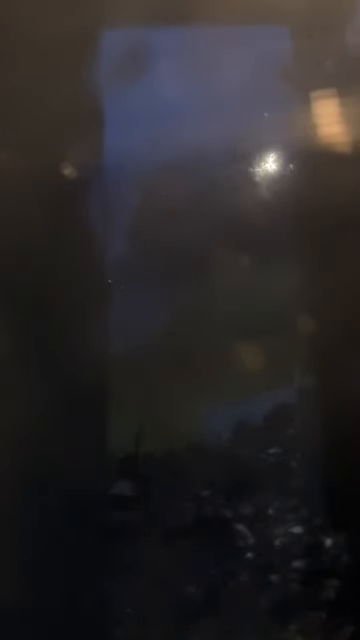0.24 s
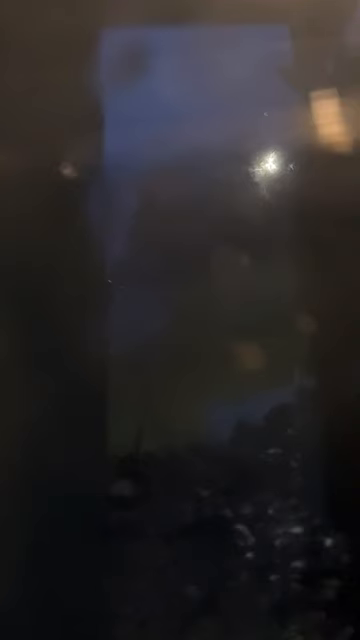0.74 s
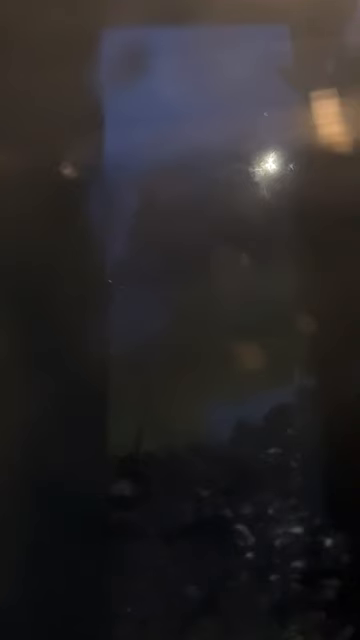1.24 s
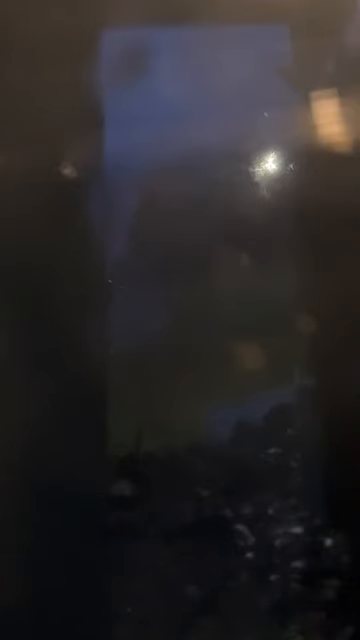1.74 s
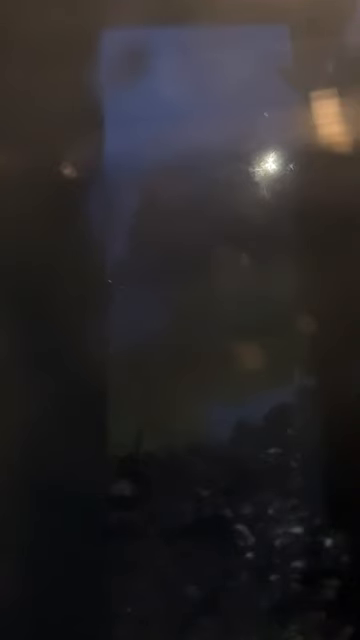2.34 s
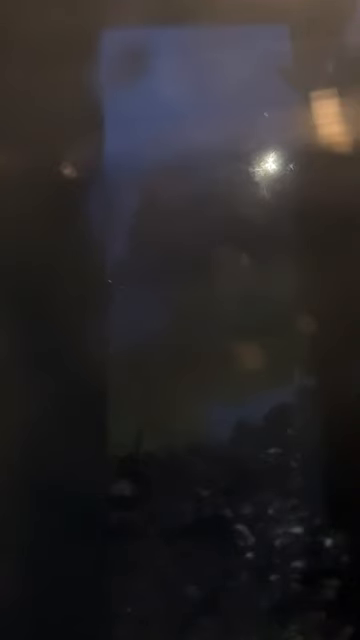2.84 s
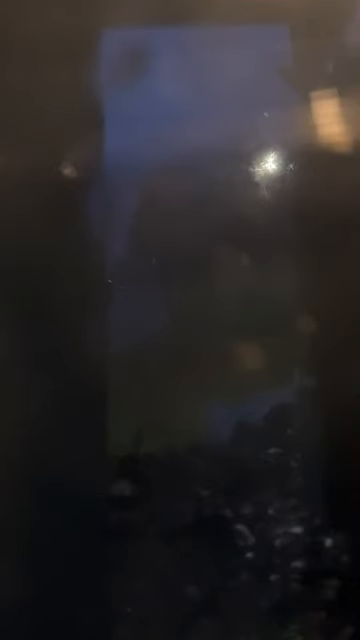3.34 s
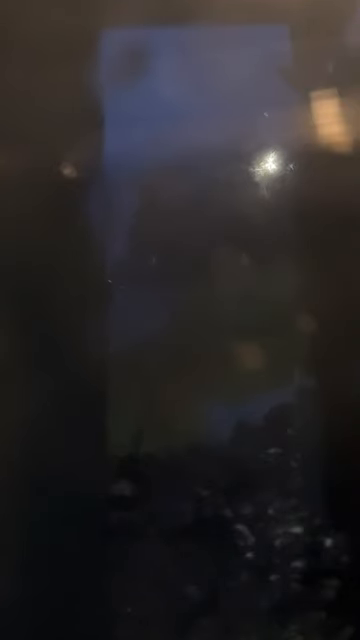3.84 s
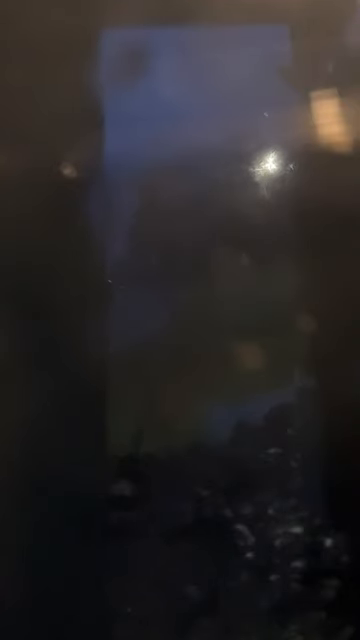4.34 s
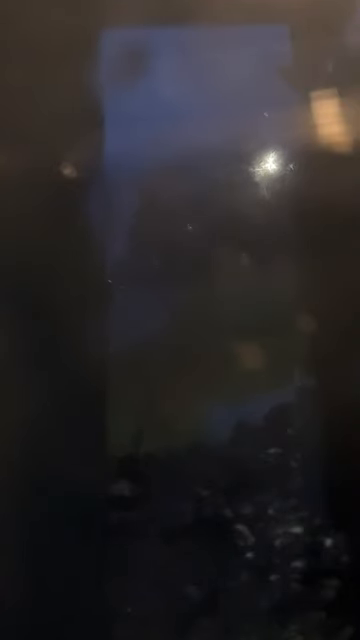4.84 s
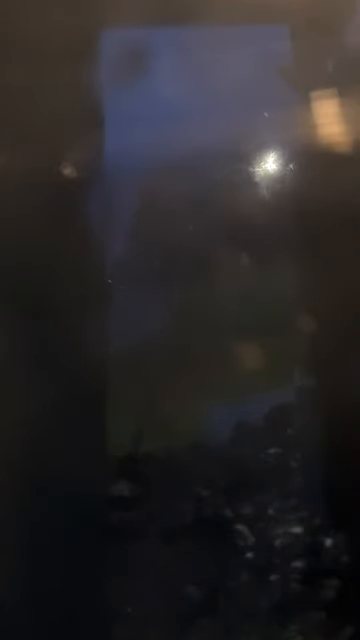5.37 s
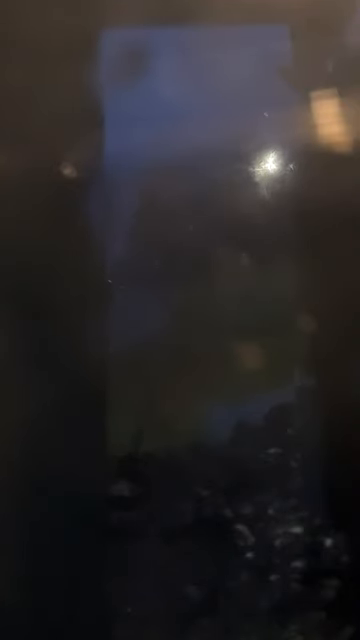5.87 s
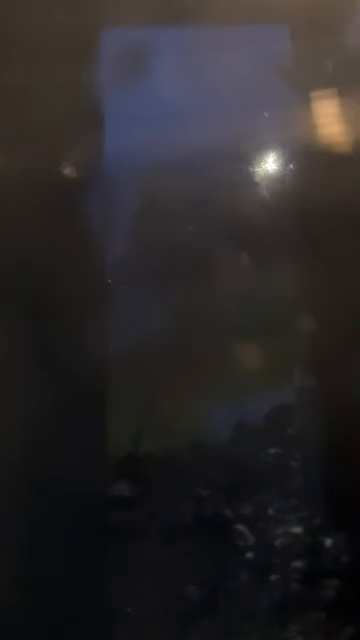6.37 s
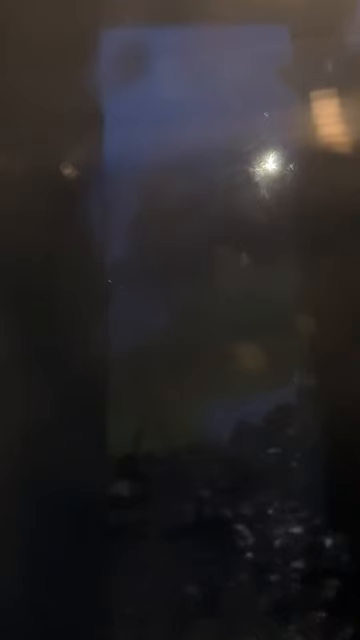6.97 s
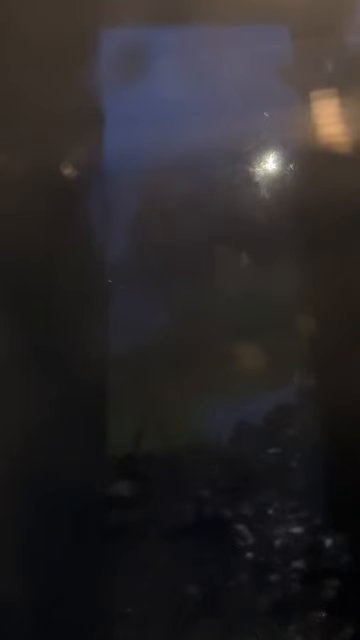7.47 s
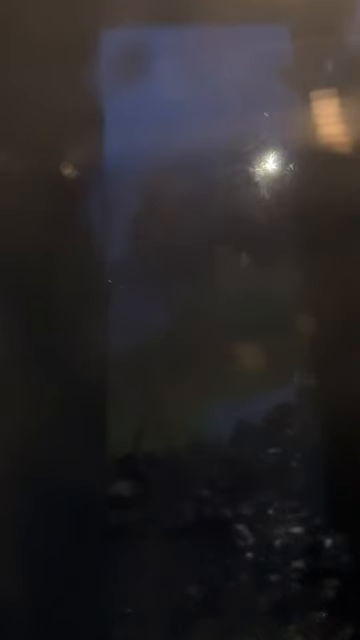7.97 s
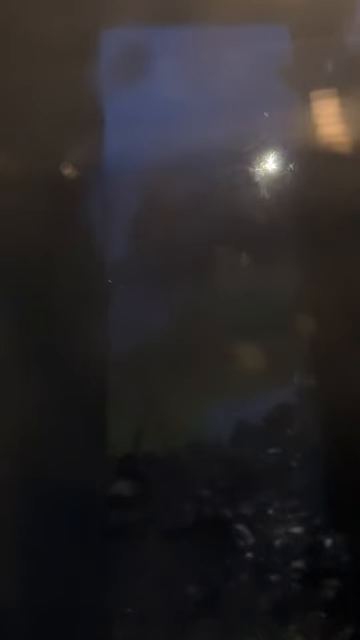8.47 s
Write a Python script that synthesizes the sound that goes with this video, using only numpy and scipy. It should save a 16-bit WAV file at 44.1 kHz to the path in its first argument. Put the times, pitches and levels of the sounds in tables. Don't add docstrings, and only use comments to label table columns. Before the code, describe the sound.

Indoors by a window on a rainy night, the microphone close to the glass. Drops strike the pane at random, crisp splashy ticks with short woody thuds, sparse at first and denser later, strongest around seven and a half seconds. Dull knocks come from the frame. Outside, drips plop from the gutter over soft patter, constant hiss and low town rumble.

```python
import sys
import numpy as np
from scipy import signal
from scipy.io import wavfile

SR = 44100
rng = np.random.default_rng(int(sys.argv[2]) if len(sys.argv) > 2 else 0)


def boost(x):
    u = np.asarray(x, float) / 20
    return 10 ** u


def materialize(psi):
    bounded = np.clip(np.atleast_2d(psi).T, -1, 1)
    quanta = np.round(bounded * 32767).astype(np.int16)
    wavfile.write(sys.argv[1], SR, quanta)


N = 384111

# f/Hz, level/dB, t60/s
HIGH_MODES = [(4280, -4, 0.0089), (4590, -1.5, 0.0028), (4900, -5.5, 0.0098), (5280, -3.5, 0.011),
              (6050, -0.5, 0.0061), (6420, -12, 0.022), (6840, -4, 0.0071), (7050, -2.5, 0.0036),
              (7580, -3, 0.0062), (8470, 0, 0.0035), (9140, -16, 0.0064), (9204, -2.5, 0.0092)]


def rms_one(x):
    return x / np.sqrt(np.mean(x ** 2) + 1e-20)


def drift(rate):
    r = np.exp(-80 * np.pi * rate / SR)
    slow = signal.lfilter([1], [1, -2 * r, r * r], rng.standard_normal(N // 40 + 2002))[2000:]
    return np.interp(np.arange(N) / 40, np.arange(len(slow)), rms_one(slow))


def clicks(s, db):
    out = np.full(N, 1e-18)
    at = np.clip(np.round(s * SR).astype(int), 0, N - 1)
    np.add.at(out, at, boost(db))
    return out


def fade(marks, t60):
    return signal.lfilter([1], [1, -boost(-60 / (t60 * SR))], marks)


def ring(push, hz, t60):
    r = boost(-60 / (t60 * SR))
    w = 2 * np.pi * hz / SR
    gain = np.sqrt(2 * (1 - r * r)) * np.sin(w)
    return signal.lfilter([0, gain], [1, -2 * r * np.cos(w), r * r], push)


def high_pass(x, hz):
    return signal.sosfilt(signal.butter(4, hz, "high", fs=SR, output="sos"), x)


def pane():
    # t/s, level/dB, favoured f/Hz
    knocks = [
        (0.011, -33, 1060),
        (0.255, -33, 640),
        (1.107, -29, 1140),
        (1.476, -28, 624),
        (2.681, -30, 794),
        (4.379, -32, 867),
        (5.651, -29.5, 1430),
        (6.847, -40, 816),
        (7.677, -53, 1440),
        (7.99, -45, 1290),
    ]
    # f/Hz, level/dB, t60/s
    low_modes = [(521, -7.5, 0.033), (655, -5, 0.066), (708, -5, 0.024), (802, -1.5, 0.033),
                 (920, -9, 0.056), (1050, -7.5, .03), (1100, -4, 0.016), (1245, -9, 0.019),
                 (1418, 1.5, 0.014), (1527, -5.5, 0.019)]
    middle_modes = [(1820, -7.5, 0.029), (1966, -4.5, 0.042), (2147, -8, 0.045), (2550, -8, 0.063),
                    (2920, -5, 0.027), (3244, 2, 0.022), (3604, -4, 0.018)]
    s, db, high_hz, thud_db, low_hz, middle_db = drops()
    knock_s, knock_db, knock_hz = np.transpose(knocks)

    low = struck(np.r_[s, knock_s], np.r_[db + thud_db, knock_db - 2], low_modes,
                 splash_t60=0.071, late_s=0.00082, blow=1.57,
                 favoured_hz=np.r_[low_hz, knock_hz], focus_db=5.0, reach=0.16)
    middle = struck(s, db + middle_db, middle_modes, splash_t60=0.024, late_s=0.001, scatter_db=1.0)
    high = struck(s, db, HIGH_MODES, splash_t60=0.025, late_s=0.0001,
                  favoured_hz=high_hz, focus_db=4.5, reach=0.11)

    spread = fade(clicks(s, db - 20), 0.011) - fade(clicks(s, db - 1.0), 0.0034)
    crack = spread * np.diff(rng.standard_normal(N + 1))
    wash = fade(clicks(s + 0.003, db - 20.0), 0.084) * rng.standard_normal(N)
    body = high_pass(boost(-13.5) * low + boost(-4) * middle, 500)
    return body + boost(-9.5) * high + crack + high_pass(wash, 900)


def drops():
    # t/s, splash level/dB, favoured high f/Hz, low modes re splash level/dB
    centre = [(1.6274, -23, 4500, -2.5), (1.9174, -26.5, 5280, -2.5), (2.3637, -25.5, 4440, 2.5),
              (2.6598, -23.5, 6600, 2), (2.9182, -19, 9000, -13.5), (3.135, -19.5, 4100, -2),
              (3.6967, -23.5, 6370, -3.5), (4.0108, -22.5, 6970, -4), (4.2192, -27.5, 7670, -1),
              (4.2674, -21, 5200, -1.5), (4.2808, -22, 7120, -3), (4.4515, -28, 7430, -1.5),
              (4.8005, -25.5, 4400, -8.5), (5.7708, -22, 9100, -6.5), (6.6288, -26, 7030, 0),
              (6.6434, -24, 8660, -8.5), (6.9959, -29.5, 7400, -10), (7.2873, -22.5, 8500, -9),
              (7.4919, -12, 6050, -8), (7.6999, -18.5, 6050, -1.5), (7.7157, -23.5, 4900, -10),
              (7.7276, -28, 7200, 3), (7.7607, -25.5, 7050, -0.5), (7.7715, -16.5, 8000, 1),
              (8.1156, -17, 6670, 1.5), (8.3971, -28.5, 4350, 5), (8.4156, -29, 7050, 1),
              (8.446, -20.5, 4750, -3), (8.5089, -25.5, 4640, -3), (8.6134, -29, 7340, 4)]
    edge = [(0.7122, -34, 6060, 2), (0.92, -26.5, 5250, -3), (1.1945, -22, 5040, 3), (1.792, -34, 6340, -3),
            (2.0625, -23, 6200, -8), (2.1495, -21, 5950, -5.5), (2.3413, -14, 6240, -4),
            (2.868, -28.5, 7900, -1.5), (3.8099, -16.5, 6060, 0.5), (4.7182, -31.5, 8810, -1),
            (4.7258, -29, 5340, -7), (4.7655, -30.5, 4450, -1.5), (4.9802, -24.5, 8060, -5),
            (5.4356, -21.5, 6400, 1.5), (5.7605, -22, 6170, -1), (5.893, -23, 7740, -6),
            (6.0083, -28, 4300, -2), (6.0724, -30, 7580, 1.5), (6.1666, -28, 4200, -2),
            (6.2965, -30.5, 7140, 1), (6.395, -34.5, 4170, -17), (6.4189, -30.5, 4280, -1.5),
            (6.4492, -29.5, 8100, -2.5), (6.6724, -21.5, 6960, -4), (6.731, -28, 7640, -8.5),
            (7.0105, -28.5, 7640, 7.5), (7.556, -16, 5060, -4.5), (7.7873, -22, 5150, -3.5),
            (8.338, -26, 6600, -3.5), (8.4194, -22, 6270, -6)]
    # t/s, splash level/dB
    glancing = [(0.2346, -34.5), (2.9872, -33.5), (3.4807, -34.5), (4.5721, -29), (4.5988, -34),
                (4.8235, -27.5), (5.4965, -31), (6.208, -32), (6.964, -35.5), (7.329, -32.5),
                (7.6295, -32.5), (7.8543, -29), (7.8834, -31), (8.2562, -26.5), (8.3278, -28)]
    middling = [(0.1314, -31), (1.2287, -33.5), (1.2981, -32.5), (1.4177, -32), (1.4342, -32.5),
                (1.6675, -32), (3.1283, -33.5), (3.9461, -32.5), (3.9912, -29.5), (4.0798, -36.5),
                (4.0929, -32.5), (4.109, -32.5), (4.4871, -29), (4.5085, -37), (4.8469, -34),
                (4.8778, -32.5), (5.0875, -35), (5.2026, -34.5), (5.6102, -33.5), (5.7443, -30.5),
                (5.9784, -34.5), (6.2773, -30), (6.3706, -34.5), (6.3853, -27), (6.5511, -38.5),
                (7.0942, -32), (7.4729, -30.5), (8.0493, -33.5), (8.499, -31), (8.6626, -32)]
    light = [(0.1566, -38.5), (0.2692, -35.5), (0.2931, -33), (0.401, -37.5), (0.649, -42.5),
             (0.8904, -36.5), (1.5938, -34.5), (1.6888, -34), (2.1118, -34), (3.5208, -36), (3.871, -36.5),
             (4.1967, -39), (4.4026, -38.5), (4.6282, -36.5), (4.9207, -34), (5.1434, -37), (5.451, -37.5),
             (5.9124, -40), (6.1305, -35.5), (6.2675, -36), (6.324, -33.5), (6.696, -34), (6.7558, -36),
             (6.843, -37.5), (7.458, -35.5), (7.6476, -36.5), (7.6586, -35), (7.6722, -42), (8.0274, -34),
             (8.5795, -38)]
    faint = [0.202, 1.554, 1.754, 1.8908, 1.9587, 2.2173, 2.563, 3.5435, 3.7886, 3.847, 4.142, 4.317, 4.474,
             4.6433, 5.165, 5.6604, 6.097, 6.1546, 6.188, 6.5568, 6.809, 6.875, 7.033, 7.0796, 7.1597,
             7.519, 7.582, 7.973, 8.1606, 8.5454]
    centre_hz, edge_hz = 740, 1600
    glancing_thud_db, middling_thud_db, soft_thud_db = -21.5, -1.5, -1

    big = [(*row, centre_hz) for row in centre] + [(*row, edge_hz) for row in edge]

    spray_db, spray_spread_db, spray_after_s = -49, 3, 0.04
    spray = []
    for row, (late, size) in zip(big, rng.exponential(1, (len(big), 2))):
        speck_db = spray_db + spray_spread_db * np.tanh(size - 1)
        spray.append((row[0] + spray_after_s * (0.5 + late), speck_db, soft_thud_db))

    small = [(s, db, glancing_thud_db) for s, db in glancing]
    small += [(s, db, middling_thud_db) for s, db in middling]
    small += [(s, db, soft_thud_db) for s, db in light]
    small += [(s, -41, soft_thud_db) for s in faint] + spray

    landed = []
    for (s, db, thud_db), (a, b) in zip(small, rng.random((len(small), 2))):
        landed.append((s, db, 4200 * 2 ** (1.1 * a), thud_db, centre_hz if b < 0.5 else edge_hz))
    s, db, high_hz, thud_db, low_hz = np.transpose(big + landed)

    middle_db = -6 - 0.1021 * (db - db.mean()) + 2 * rng.standard_normal(len(s))
    return s, db, high_hz, thud_db, low_hz, middle_db


def struck(s, db, modes, splash_t60, late_s, favoured_hz=None, scatter_db=2.0, focus_db=7.0, reach=0.2, blow=0):
    place = rng.standard_normal((len(s), len(modes)))
    out = np.zeros(N)
    for k, (hz, mode_db, t60) in enumerate(modes):
        arrival = s + late_s * np.sqrt(1000 / hz)
        strength_db = db + mode_db + scatter_db * place[:, k]
        if favoured_hz is not None:
            octaves_off = np.log2(hz / favoured_hz)
            strength_db = strength_db + focus_db * np.exp(-(octaves_off / reach) ** 2)
        marks = clicks(arrival, strength_db)
        push = fade(marks, splash_t60) + blow * fade(marks, 0.0038)
        out += ring(push * rng.standard_normal(N), hz, t60)
    return out


def drizzle(per_s=120, spread_db=2.0):
    sizes = boost(spread_db * np.minimum(rng.exponential(1, N), 3))
    ticks = sizes * (rng.random(N) < per_s / SR)
    push = fade(ticks, 0.021) * rng.standard_normal(N)
    glass = np.zeros(N)
    for k, (hz, db, t60) in enumerate(HIGH_MODES):
        glass += boost(db) * ring(push, hz, t60) * (-1) ** k
    return rms_one(high_pass(glass, 3000))


def drips(rough=1.0):
    # t/s, peak level/dB, f/Hz
    drip_rows = [(0.293, -35, 3400), (0.3123, -25.5, 2690), (0.384, -35.5, 2640), (1.968, -25.5, 2550),
                 (2.003, -35, 2480), (2.3994, -27, 2200), (2.599, -33, 2260), (3.7864, -33, 2970),
                 (3.963, -25.5, 2540), (5.053, -29, 2430), (5.6703, -31, 2730), (6.1345, -36, 2740),
                 (6.7645, -31.5, 2480), (6.8674, -17.5, 2630), (7.1748, -23, 2580), (7.278, -30, 2560),
                 (7.427, -25.5, 2590), (7.674, -35, 3260), (7.953, -30, 2800), (8.5475, -36.5, 2140)]
    # t/s, peak level/dB, f/Hz, t60/s
    pings = [
        (4.851, -37.5, 3150, 0.08),
        (4.881, -41, 3120, 0.21),
    ]
    drip_t60 = 0.012
    length = 8000
    t = np.arange(length) / SR
    out = np.zeros(N + length)
    spray = rms_one(fade(fade(rng.standard_normal(N + length), 0.0062), 0.0062))
    for s, db, hz, t60 in [(*row, drip_t60) for row in drip_rows] + [*pings]:
        at = round(s * SR)
        onset = 1 - np.exp(-t / 0.00074)
        fall = boost(db + 1 - 60 * t / t60)
        fray = 1 + rough * min(1, drip_t60 / t60) * spray[at:at + length]
        out[at:at + length] += onset * fall * np.sin(2 * np.pi * hz * t) * fray
    return out[:N]


def patter(per_s=700, spread_db=6.5, cycles=23.5):
    sizes = boost(spread_db * np.minimum(rng.exponential(1, N), 4)) * rng.choice([-1, 1], N)
    born = rng.random(N) < per_s / SR
    pitches = np.geomspace(620, 3400, 16)
    dealt = rng.integers(0, 16, N)
    out = np.zeros(N)
    for k, hz in enumerate(pitches):
        out += ring(sizes * born * (dealt == k) + 1e-18, hz, cycles / hz)
    return rms_one(out)


def hiss(swell_db, patchy_db=2.0):
    # f/Hz, level per Hz/dB
    tone = [(36, -28.5), (57, 6.5), (75, 1), (115, 8.5), (329, 1.5), (455, -3.5), (642, -2), (1450, -3),
            (1690, -4), (2550, -4), (3250, -8.5), (4300, -17), (8000, -18), (9500, -23)]
    tone_hz, tone_db = np.transpose(tone)
    edges = 28 * 2 ** np.arange(0, 8.6, 1 / 5)
    white = rng.standard_normal((2, N + SR // 2))
    out = np.zeros(N)
    for k, (low, high) in enumerate(zip(edges, edges[1:])):
        sos = signal.butter(2, [low, high], "band", fs=SR, output="sos")
        band = signal.sosfilt(sos, white[k % 2])[-N:]
        band_db = np.interp(np.log(low * high) / 2, np.log(tone_hz), tone_db)
        rumble_db = swell_db * (high < 260)
        out += boost(band_db + rumble_db + patchy_db * drift(5.0)) * band
    return rms_one(out)


def scene():
    # t/s, hiss level/dB
    rain_curve = [
        (0.0, -44.5),
        (0.61, -45),
        (3.25, -44.8),
        (4.15, -43),
        (7.08, -44),
        (7.52, -43),
        (8.71, -43.5),
    ]
    rain_db = np.interp(np.arange(N) / SR, *np.transpose(rain_curve))
    swell_db = -0.66 * (rain_db + 48.5) + 0.8 * drift(0.8)
    outside = boost(1.5) * hiss(swell_db) + boost(-7.5) * patter() + boost(-20.5) * drizzle()
    return (pane() + drips() + boost(rain_db) * outside)[None]


def top_cut(x):
    return signal.sosfilt(signal.butter(12, 9640, fs=SR, output="sos"), x)


def record(dry):
    treble_cut = signal.ellip(10, 0.5, 60, 9750, fs=SR, output="sos")
    mix = signal.sosfilt(treble_cut, high_pass(dry, 40))
    return top_cut(mix)


dry = scene()
out = record(dry)
materialize(out)
```